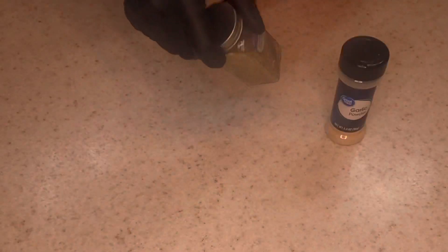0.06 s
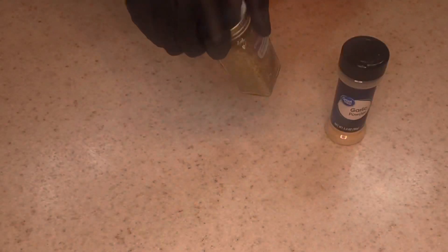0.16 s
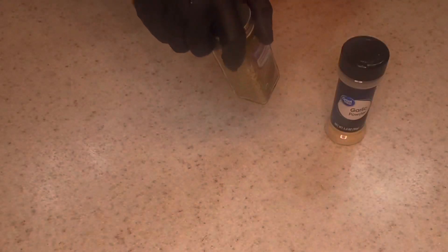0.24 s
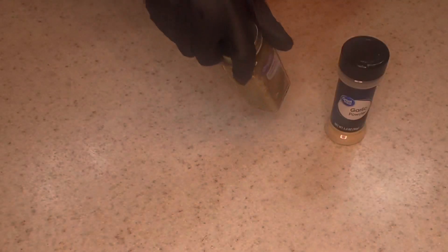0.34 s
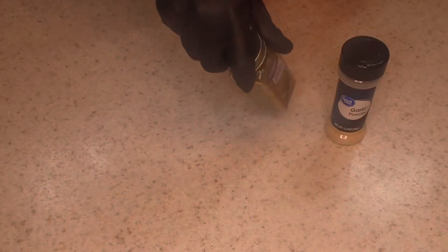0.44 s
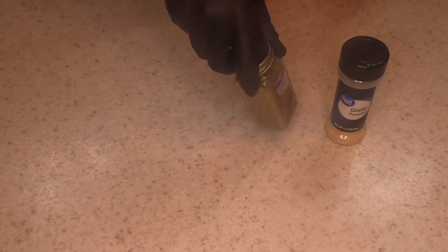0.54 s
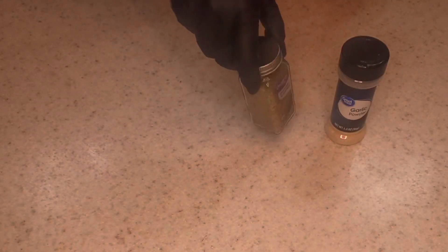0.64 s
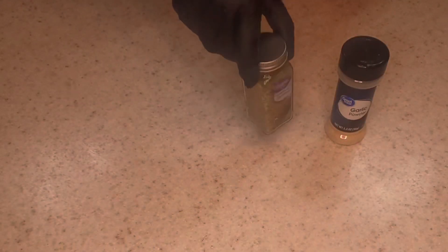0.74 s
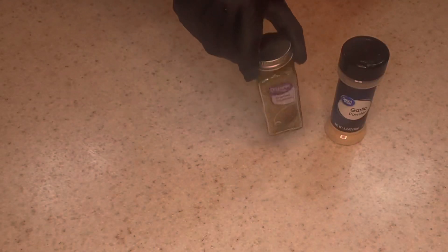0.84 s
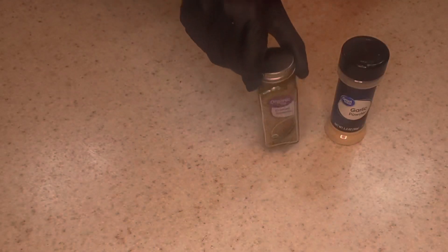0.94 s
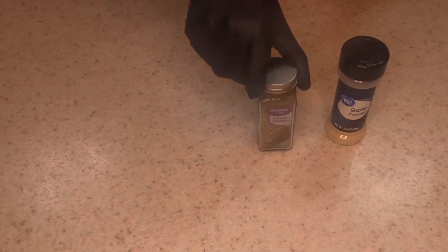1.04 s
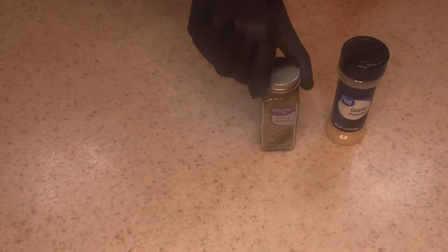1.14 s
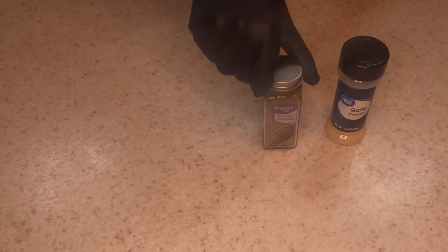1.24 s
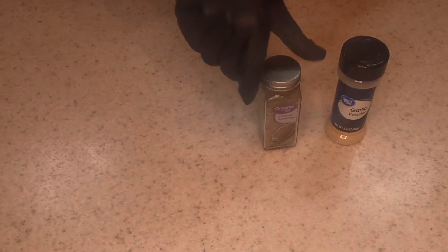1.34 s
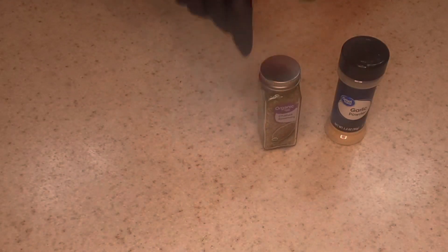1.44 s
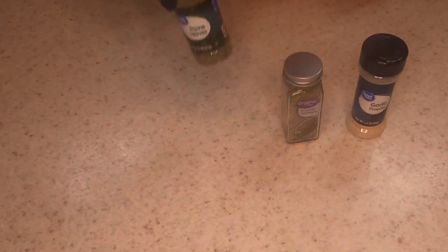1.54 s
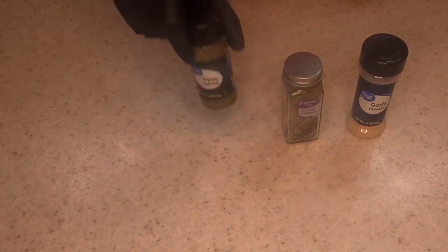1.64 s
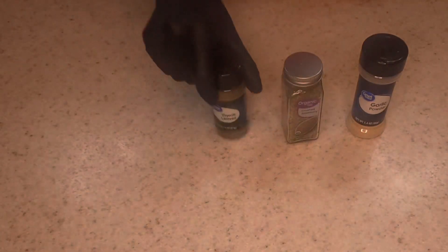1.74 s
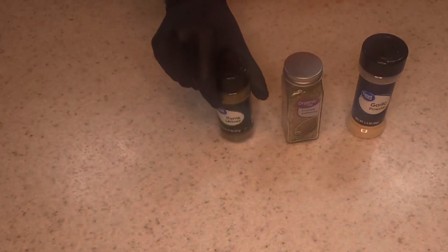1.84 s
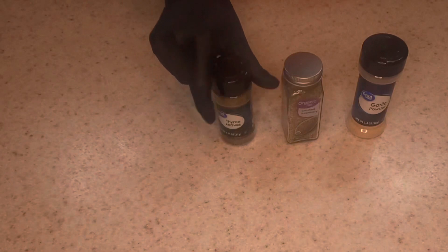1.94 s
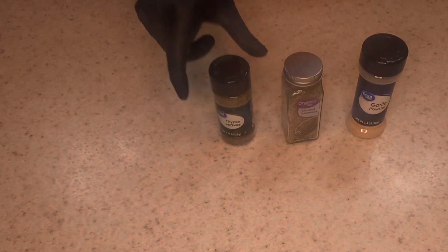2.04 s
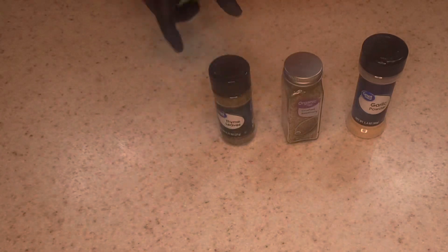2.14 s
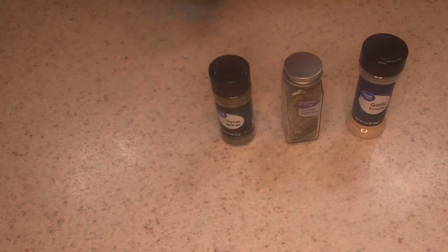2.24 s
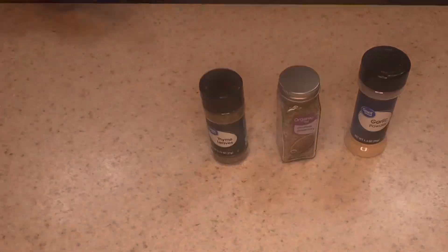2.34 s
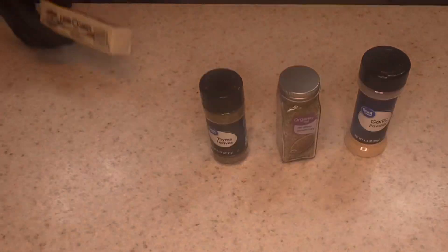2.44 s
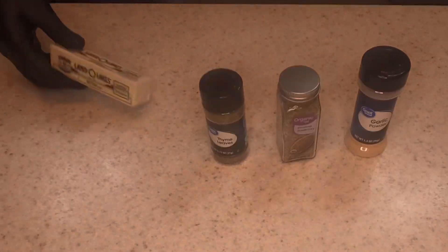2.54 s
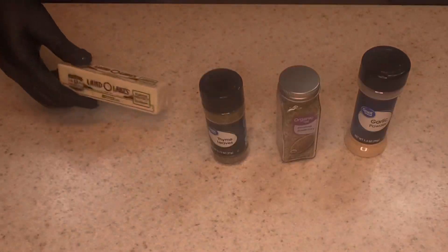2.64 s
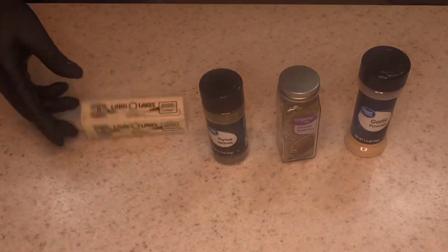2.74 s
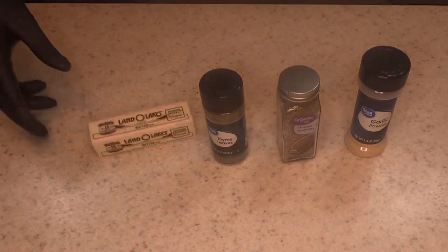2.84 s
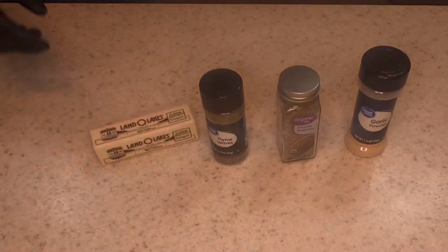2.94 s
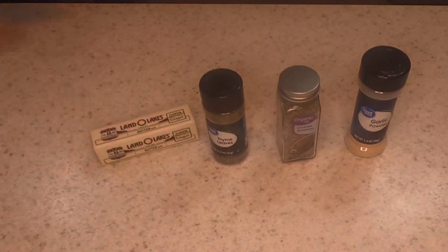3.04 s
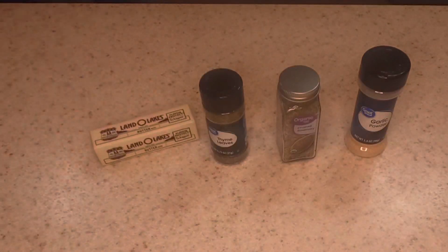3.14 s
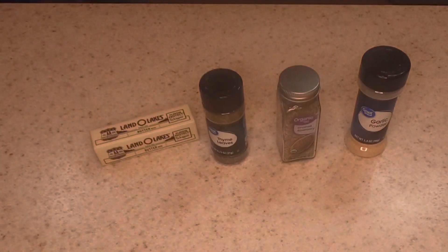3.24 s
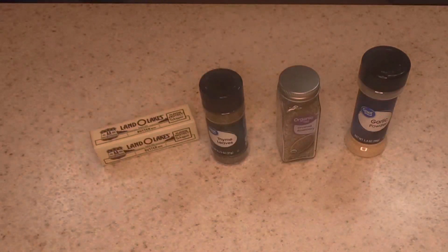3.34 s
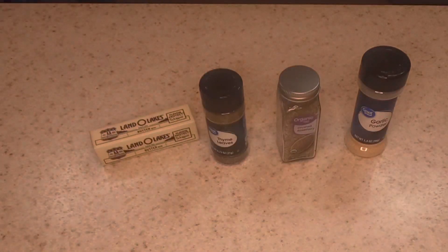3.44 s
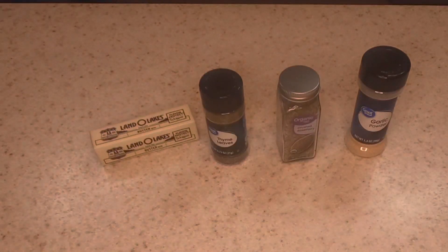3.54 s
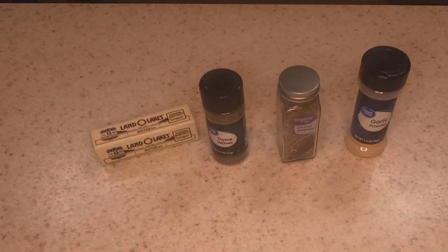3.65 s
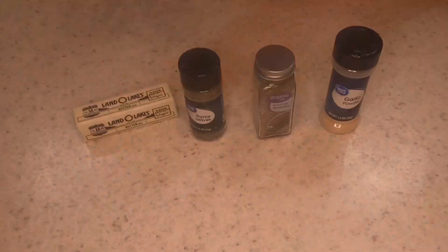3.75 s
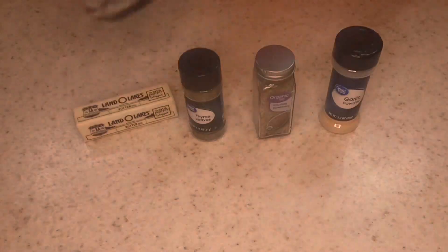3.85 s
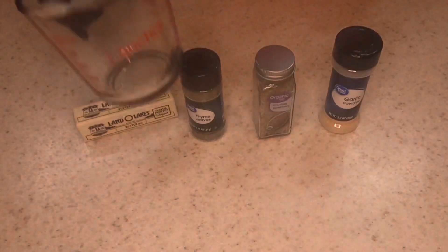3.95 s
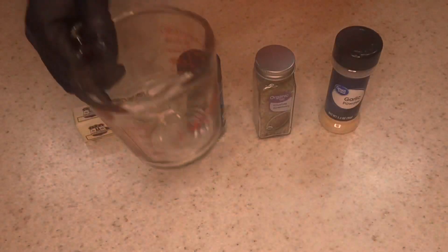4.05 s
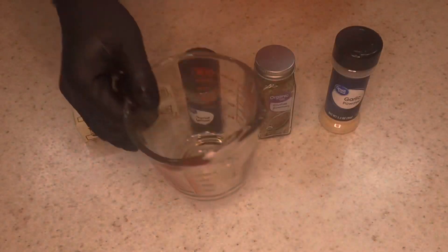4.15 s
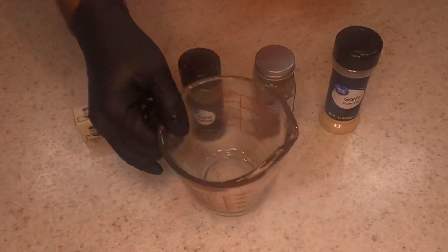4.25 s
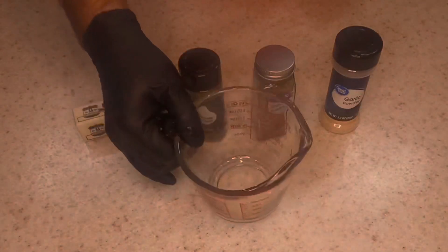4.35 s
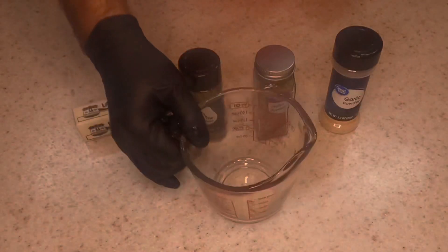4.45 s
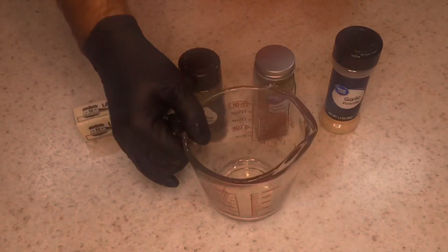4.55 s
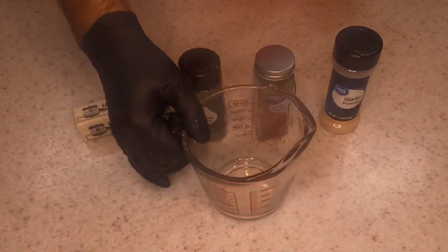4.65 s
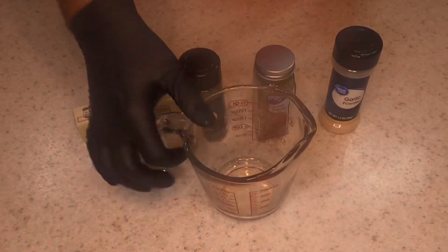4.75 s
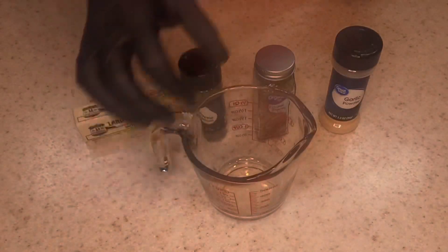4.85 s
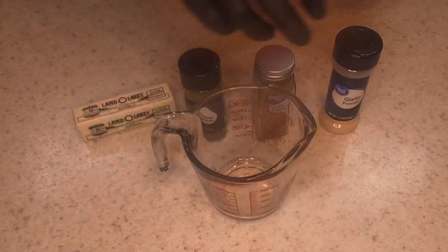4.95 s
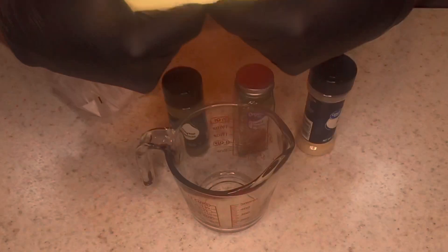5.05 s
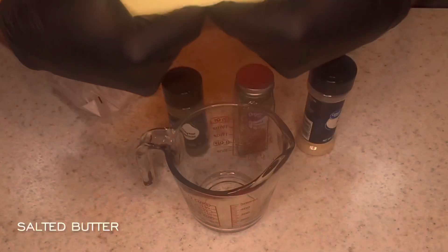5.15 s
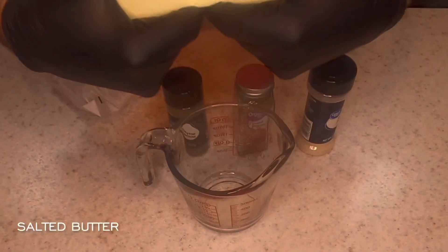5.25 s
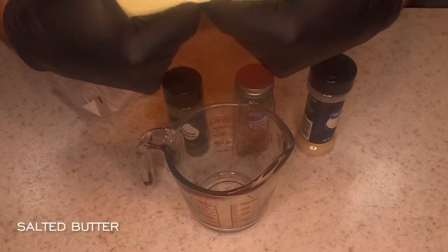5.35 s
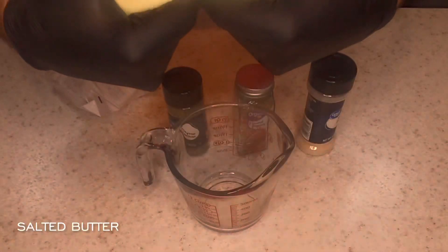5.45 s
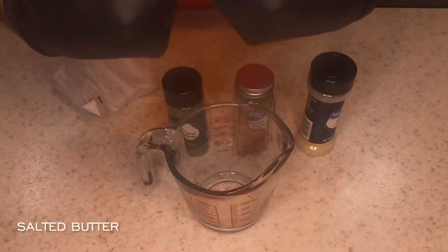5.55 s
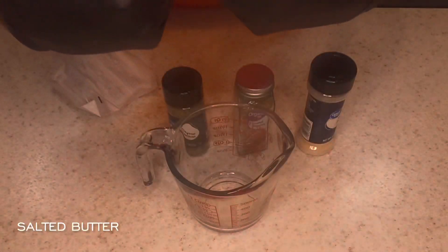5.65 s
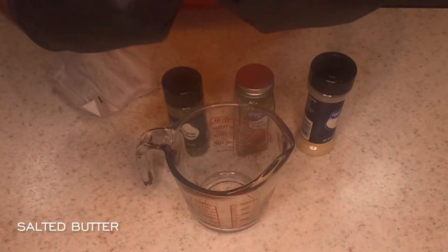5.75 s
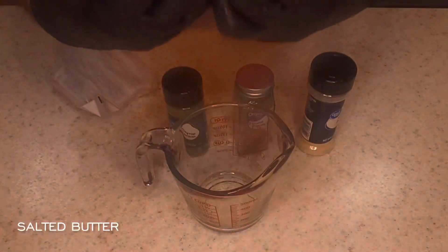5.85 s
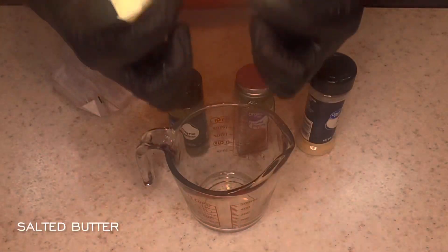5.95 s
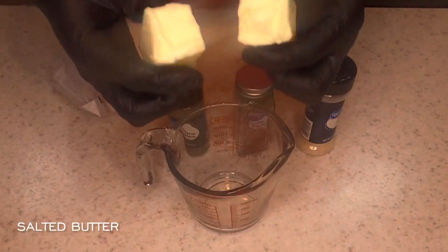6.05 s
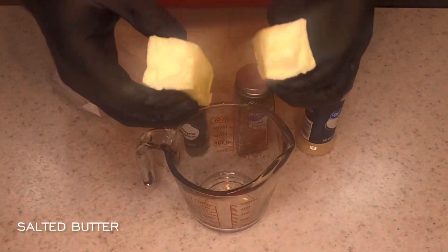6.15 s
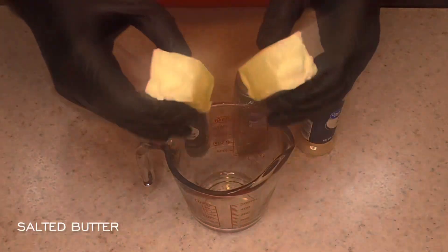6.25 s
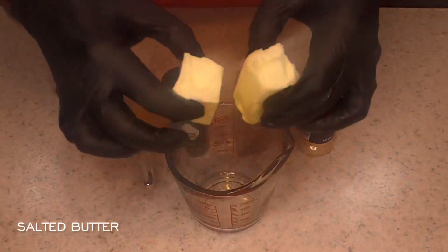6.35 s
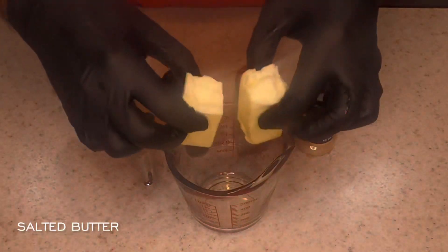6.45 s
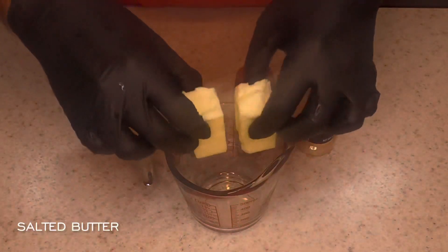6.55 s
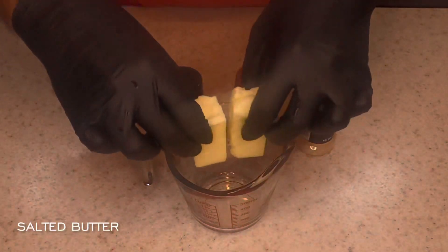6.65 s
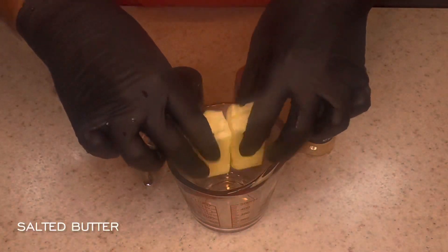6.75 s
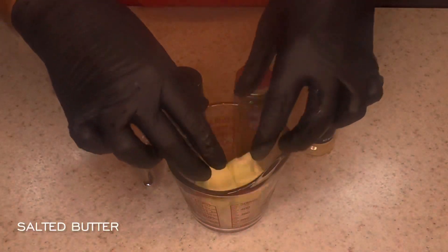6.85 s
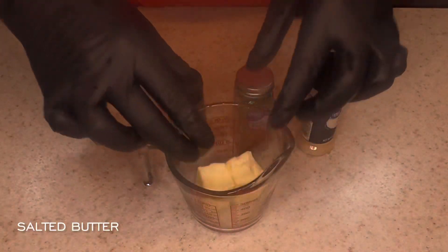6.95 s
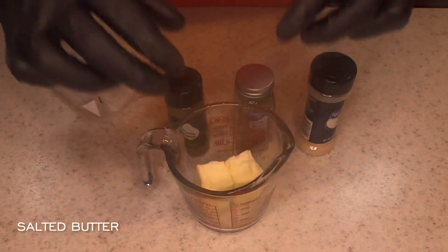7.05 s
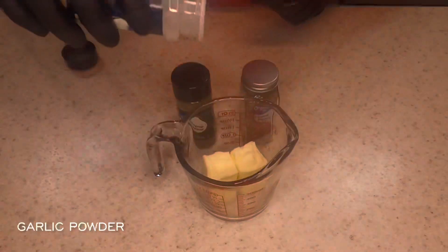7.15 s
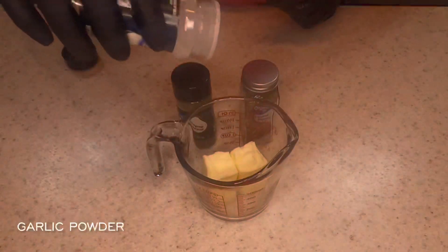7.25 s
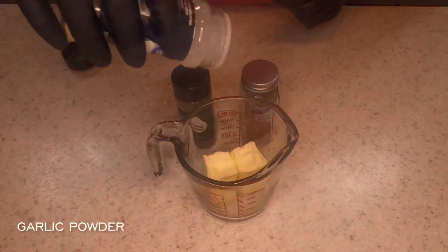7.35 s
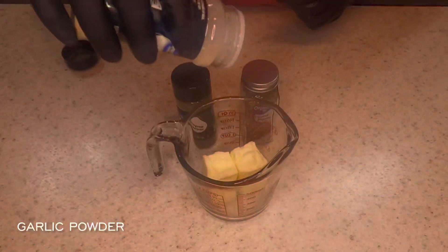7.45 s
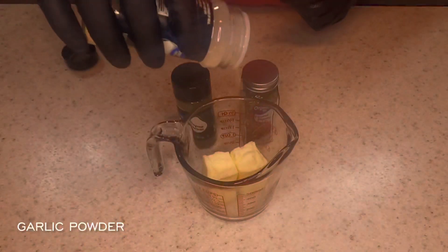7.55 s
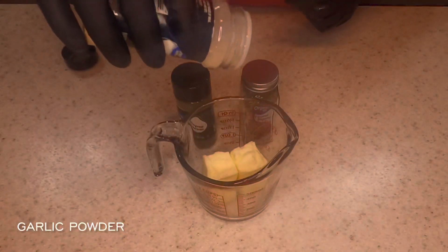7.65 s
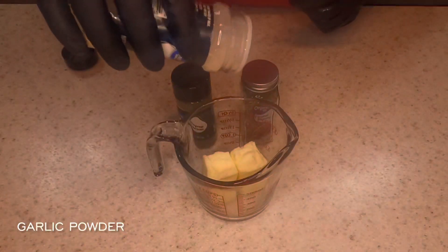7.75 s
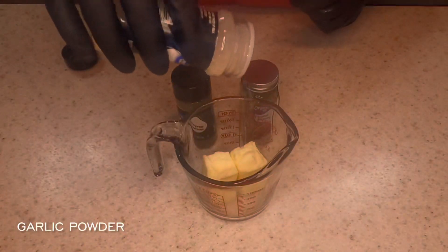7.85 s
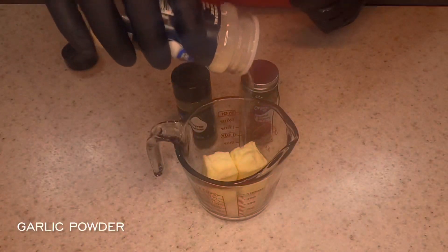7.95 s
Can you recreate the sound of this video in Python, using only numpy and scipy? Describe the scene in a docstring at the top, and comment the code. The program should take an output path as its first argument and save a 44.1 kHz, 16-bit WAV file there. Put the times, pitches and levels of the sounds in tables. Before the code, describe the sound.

Spaced woody thuds on a kitchen countertop, a brighter glassy knock, soft wrapper and glove rustling, then butter thumping into a ringing glass cup.

```python
"""A low ventilation rumble and a faint rustle come first, then knocks on a kitchen countertop.
Gloved hands set down two spice jars, a stick of butter and a glass measuring cup, then drop butter into the cup.
Each knock is a bending wave in the slab with decaying modes and the tail of a hard-walled room.
Filtered random impulses make the rustle, short bursts the ticks, swelling bands of hiss the scuffs.
The ventilation is shaped noise; the level dips briefly six times, the first at the very start."""
import sys
import numpy as np
from scipy import signal
from scipy.fft import rfft, irfft
from scipy.io import wavfile
from scipy.ndimage import uniform_filter1d

SR = 44100
rng = np.random.default_rng(int(sys.argv[2]) if len(sys.argv) > 2 else 0)


def master(y):
    """Save y as 16-bit WAV."""
    cut = np.clip(np.atleast_2d(y).T, -1, 1)
    pcm = np.round(cut * 32767)  # scale
    wavfile.write(sys.argv[1], SR, pcm.astype(np.int16))


N = 352800

# colour of each thing against the counter, by name: (frequency [Hz], level [dB])
IMPACT_COLOUR = { "square jar": [(32, -4.5), (120, -3.5), (264, 2.5), (338, -3.5), (460, -14.5), (575, -3),
                 (660, -16.5), (1000, -13), (1400, -13.5), (2000, -18), (2900, -28), (5100, -39.5),
                 (10000, -61.5), (14000, -84)], "round jar": [(32, -7), (103, -10), (200, -3), (299, 0.5),
                 (420, -23), (490, -12), (717, -26), (1250, -24), (1670, -16.5), (2450, -28), (4600, -25.5),
                 (5400, -32.5), (9200, -37), (14000, -61)], "butter": [(32, -1.5), (110, -2), (220, 1.5),
                 (300, -1), (350, -13.5), (480, -8.5), (700, -16.5), (830, -16), (1600, -18.5),
                 (2200, -25.5), (2800, -30), (5600, -39), (9000, -50.5), (14000, -72)], "cup": [(32, -5.5),
                 (80, -4.5), (115, -11), (200, 1), (290, -8.5), (380, -4), (540, -9.5), (700, -13.5),
                 (1000, -12), (2700, -18), (3700, -27), (5600, -38), (10000, -60.5), (14000, -89)],
                 "butter in cup": [(32, 1), (60, 0), (125, -7), (185, 2), (280, -8.5), (425, -19),
                 (700, -23), (1600, -27), (2800, -31.5), (3700, -37), (4500, -40.5), (6500, -51.5),
                 (10000, -62), (14000, -79)], }
# parts of the knocks on the counter; the first row is only a faint lead-in just before the first knock:
# (time [s], colour name, relative level [dB], treble cut-off [Hz], weight in the bass [dB],
# ring-out [dB], chatter [dB])
KNOCK_PARTS = [ (1.0377, "square jar", -40.5, 7160, -10, 7.5, -2),
               (1.049, "square jar", -12, 12000, -7.5, 0, -6),
               (1.7899, "round jar", -15, 11000, -1.5, -3.5, -5),
               (2.788, "butter", -17.5, 330, -9.5, 6, -13), (2.818, "butter", -9.5, 14000, -5.5, -1, 1.5),
               (2.8920, "butter", -19, 7000, 1, 0.5, 3.5), (4.4328, "cup", -18.5, 12000, 2, 0, 1.5),
               (4.4347, "cup", -33, 4000, -11, -17, -3), (4.6200, "cup", -25.5, 11000, 1.5, -1, -2),
               (4.6360, "cup", -24.5, 11000, 4, -5, 4), (6.8848, "butter in cup", -14, 2230, -2.5, 4.5, 7),
               (6.89, "butter in cup", -25, 6000, -3, -12, 17),
               (6.8978, "butter in cup", -17, 12000, -17, 4.5, 8), ]
# modes of the counter slab and the cabinet under it: (frequency [Hz], relative peak [dB], t60 [s])
COUNTER_MODES = [(37, -9, 0.38), (57.7, -6, 1), (65.4, 9.5, 0.45), (78.7, -17, 1), (92.7, 9, 0.5),
                 (106.8, -4.5, 1), (158.2, 6, 0.37), (189, -0.5, 0.33), (208.4, 2.5, 0.25),
                 (252.8, 6, 0.42), (309, 0.5, 0.51), (361.5, 10.5, 0.47), (434, -3, 1), (473.6, 9.5, 0.47),
                 (717, 9.5, 0.45), (840, -0.5, 0.86), (1016, 13.5, 0.5), (1290, -13, .42),
                 (1365, -5.5, 0.35), (1885, 12.5, 0.69)]
# modes of the glass cup's wall: (frequency [Hz], relative peak [dB], t60 [s])
CUP_MODES = [(1574, 8, 0.48), (2075, 13, 0.22), (2280, 8, 0.58), (2620, -6.5, 0.71), (3104, 10.5, 0.22),
             (4130, 7, 0.24), (4441, 15, 0.31), (9700, 14, .16), (12050, 13, 0.15)]
# how strongly a knock sets the cup's wall ringing, by colour name: level [dB]
CUP_RING_DB = {"cup": -5, "butter in cup": 4.5}
# room tail: (frequency [Hz], relative level [dB], t60 [s], likeness of left and right [0-1])
KITCHEN_BANDS = [(40, -2.5, 0.45, 1), (125, -1, 0.28, 0.95), (251, -8.5, 0.66, 0.96), (576, 4, 0.53, 0.84),
                 (1390, 2.5, 0.6, 0.71), (3000, -0.5, 0.53, 0.51), (6000, -4, 0.57, 0.08),
                 (13000, -7, 0.35, 0.2)]
# ticks of wrapper, glove and lids: (time [s], relative level [dB], centre [Hz], decay time [s])
TICKS = [(0.844, -68, 7900, .002), (2.0573, -66, 9900, .002), (2.7877, -32, 6660, 0.0014),
         (2.889, -48, 5500, .0013), (2.946, -60, 8000, 0.0036), (3.3609, -58, 3900, .0014),
         (4.841, -59, 3300, .002), (5.506, -48.5, 1400, .008), (5.5087, -47.5, 5900, 0.012),
         (5.669, -61, 4400, 0.0027), (5.986, -64, 2630, .003), (6.386, -53, 4480, .003),
         (6.742, -60.5, 6000, .002), (6.7824, -48, 3780, 0.0035), (6.789, -61, 7000, .002)]
# soft scuffs of glove and paper: (time [s], level [dB], centre [Hz], nominal width [Hz], length [s])
SCUFFS = [(0.106, -63.5, 3440, 2000, 0.092), (.35, -63, 3180, 700, 0.1), (2.472, -63, 2820, 2000, 0.18),
          (3.356, -66.5, 4000, 1500, 0.13), (4.258, -71, 5430, 705, 0.23), (5.797, -65, 2810, 2000, 0.14),
          (5.904, -56, 5030, 1200, 0.054), (6.354, -58, 4700, 1500, 0.051)]
# hand moves behind the rustle: (time of peak [s], relative level [dB], swell time [s])
HAND_MOVES = [(0.15, -67, 0.36), (0.54, -73.5, 0.24), (0.85, -76, 0.083), (2.398, -62, .025),
              (2.59, -72, 0.25), (2.735, -64, .035), (4.815, -63.5, 0.078), (5.935, -57, .12),
              (6.19, -64.5, 0.17), (6.378, -57.5, 0.084), (6.466, -59.5, 0.047), (6.785, -65.5, 0.19),
              (7.56, -72.5, 0.31)]
# colour of creasing glove and wrapper: (frequency [Hz], level [dB])
RUSTLE_COLOUR = [(1200, -17), (2000, 2), (3000, -1), (4200, -1.5), (5500, 2), (7000, -1.5), (8800, -1.5),
                 (11000, -13), (13000, -10.5), (15500, -30)]
# colour of the ventilation: (frequency [Hz], level [dB])
VENT_COLOUR = [(15, -54), (25, -8.5), (43, -17.5), (86, -6), (118, -5.5), (146, -2), (231, 0), (257, -5),
               (293, -7), (363, -9.5), (438, -13), (529, -17.5), (573, -17.5), (729, -28), (1180, -21),
               (1540, -22.5), (1720, -21), (2930, -36.5), (5720, -39.5), (8100, -46), (15000, -67)]
# brief dips in level, after each of which the background is a little changed:
# (time [s], half length [s], rumble after [dB], hiss after [dB])
DIPS = [(0.0, 0.064, 0.7, -1.5), (1.546, 0.033, 0.5, 0), (2.345, 0.03, -1.5, 0.9), (3.775, 0.028, 1, 0.6),
        (5.077, 0.032, 0.87, -1.6), (7.143, 0.036, 1.5, -2)]
# colour difference between the two sides: (frequency [Hz], left minus right [dB])
SIDE_BALANCE = [(60, 0.0), (110, 0), (200, -0.5), (380, -0.5), (700, 0.0), (1290, 0), (2380, 2),
                (4400, 0.5), (8120, -1.5), (15000, -5.0)]

RING = 32768  # length of one response [samples]
AGE = np.arange(RING) / SR  # time since the start of a response [s]


def knocks(bend_s=0.00224, chatter_s=0.0028, knee_hz=300, edge_s=0.002156, edge_db=-7,
           low_cut_hz=30, shade_hz=1800, shade_db=-4, echo_db=-5):
    """Impact and dispersion: each part is a bending wave, then edge echoes, chatter, modes and room tail."""
    out, hz = np.zeros((2, N)), bins(RING)
    counter, cup = ringing(COUNTER_MODES), ringing(CUP_MODES)
    # bending waves carry treble faster than bass, so the knock arrives as a quick downward sweep
    sweep = np.exp(-4j * np.pi * bend_s * np.sqrt(hz * knee_hz))
    upper = hz / (hz + knee_hz)
    # the thing itself shades the treble of the first arrival; one echo returns from the nearest edge
    shade = undb(shade_db * hz / (hz + shade_hz))
    edge = undb(edge_db) * upper * np.exp(-2j * np.pi * hz * edge_s)
    direct = shade + edge
    fade = np.exp(-AGE / chatter_s) * (1 - np.exp(-AGE / chatter_s * 2) ** 2)
    for s, thing, db, contact_hz, weight_db, ring_db, chatter_db in KNOCK_PARTS:
        body = undb(along(IMPACT_COLOUR[thing], hz)) / np.sqrt(1 + (low_cut_hz / hz) ** 12)
        # a soft contact takes the treble away; a light one takes the bass
        weight = undb(weight_db / (1 + (hz / knee_hz) ** 2))
        touch = weight / np.sqrt(1 + (hz / contact_hz) ** 4)
        push = causal(body * touch) * np.linalg.norm(body * touch) / np.linalg.norm(body)
        chatter = rfft(irfft(diffuse(RING)) * fade / np.linalg.norm(fade))
        early = direct + upper * (undb(chatter_db) * chatter + undb(echo_db) * echoes())
        ring = counter + kitchen() + cup * undb(CUP_RING_DB.get(thing, -np.inf))
        knock = irfft(push * sweep * (early + undb(ring_db) * ring))
        add(out, s, undb(db) * knock * (AGE < until_dip(s)))
    return out


def causal(gain):
    """Minimum phase: the quickest response with this gain, its energy that of 10 ms at rms 1."""
    cepstrum = irfft(np.log(unit(gain) + 1e-6))
    cepstrum[1:RING // 2] *= 2
    cepstrum[RING // 2 + 1:] = 0
    return np.exp(rfft(cepstrum)) * np.sqrt(SR * 0.01)


def echoes(count=6, first_s=.006, last_s=0.041, dull_hz=2500):
    """Reflection: a few separate returns from the far ends of the slab and the wall behind it."""
    hz = bins(RING)
    when, side, turn = rng.random((3, count, 1))
    delay_s = first_s + (last_s - first_s) * when ** 2
    size = first_s / delay_s * np.exp(2j * np.pi * turn)  # later returns have spread further
    lag_s = (side - .5) * 2e-4  # arrival offset, opposite on the two sides
    pair = [np.sum(size * np.exp(-2j * np.pi * hz * (delay_s + sign * lag_s)), axis=0) for sign in (1, -1)]
    return np.array(pair) / np.linalg.norm(size) / np.sqrt(1 + (hz / dull_hz) ** 2)


def ringing(modes):
    """Modal decay: the spectrum of damped cosines, each with its dB as the height of its peak."""
    hz, db, t60 = np.array(modes).T[:, :, None]
    rate = np.log(1000) / t60
    height = undb(db) * 2 * rate / SR
    return rfft(np.sum(height * np.exp(-rate * AGE) * np.cos(2 * np.pi * hz * AGE), axis=0))


def kitchen(build_s=0.0035, slow_hz=600):
    """Reverberation: a diffuse tail whose bass builds up last and whose bands die at their own rates."""
    hz, noise, tail = bins(RING), diffuse(RING), 0
    centres = np.log([row[0] for row in KITCHEN_BANDS])
    for own, (band_hz, db, t60, _) in zip(np.eye(len(KITCHEN_BANDS)), KITCHEN_BANDS):
        build = 1 - np.exp(-(AGE / build_s / (1 + slow_hz / band_hz)) ** 2)
        fade = undb(-60 * AGE / t60) * build
        one_band = irfft(noise * np.interp(np.log(hz), centres, own))
        tail = tail + one_band * undb(db) * fade / np.linalg.norm(fade)
    return rfft(tail)


def diffuse(size):
    """Diffuse field: noise with bass alike left and right and treble much less so."""
    like = np.clip(along(KITCHEN_BANDS, bins(size), column=3), 0, .998)
    mid, side = rfft(rng.standard_normal((2, size)))
    return np.sqrt((1 + like) / 2) * mid + np.sqrt((1 - like) / 2) * side * np.array([[1], [-1]])


def until_dip(s):
    """Truncation: time from a moment to the next dip in level, after which a knock no longer rings."""
    return min(row[0] for row in DIPS if row[0] > s) - s


def ticks(room_db=-2, crackle_db=-1, width_share=0.72):
    """Impulsive excitation: tiny snaps with a decaying burst of crackle, each with its room tail."""
    out = np.zeros((2, N))
    for s, db, centre_hz, decay_s in TICKS:
        colour = causal(band(bins(RING), centre_hz, width_share * centre_hz))
        burst = irfft(diffuse(RING)) * np.exp(-AGE / decay_s)
        dry = colour * (1 + undb(crackle_db) * rfft(burst / np.linalg.norm(burst[0])))
        dry = dry * np.linalg.norm(colour) / np.linalg.norm(dry, axis=1, keepdims=True)
        add(out, s, undb(db) * irfft(dry + undb(room_db) * colour * kitchen()))
    return out


def scuffs():
    """Sliding friction: a slipping glove gives a band of hiss that swells and fades."""
    out = np.zeros((2, N))
    for s, db, centre_hz, width_hz, length_s in SCUFFS:
        swell = np.sqrt(np.sin(np.pi * np.minimum(AGE / length_s, 1)).clip(0))
        hiss = unit(irfft(diffuse(RING) * band(bins(RING), centre_hz, width_hz)))
        add(out, s, undb(db) * swell * hiss)
    return out


def band(hz, centre_hz, width_hz):
    """Resonance: gain of a broad peak with steep skirts, dull in the top octave."""
    return 1 / (1 + ((hz - centre_hz ** 2 / hz) / (1.44 * width_hz)) ** 2) / (1 + (hz / 12500) ** 8)


def rustle(grain_rate=1100, snap_rate=60, snap_db=-8, rustle_db=-0.5, room_db=-3, left_db=1):
    """Stick-slip: gloves and waxed paper crease in uneven slips over many bands, with some broad snaps."""
    hz, creases = bins(N), 0
    centres = np.log([row[0] for row in RUSTLE_COLOUR])
    for own in np.eye(len(RUSTLE_COLOUR)):
        # each band has its own slips, grain_rate of them per second
        creases = creases + rfft(slips(grain_rate)) * np.sqrt(np.interp(np.log(hz), centres, own))
    colour = undb(along(RUSTLE_COLOUR, hz))
    snaps = unit(irfft(rfft(slips(snap_rate)) * colour))
    dry = (unit(irfft(creases * colour)) + undb(snap_db) * snaps) * effort()
    wet = signal.fftconvolve(dry[None], irfft(kitchen()), axes=1)[:, :N]
    lean = undb(np.array([[left_db], [-left_db]]) / 2)
    return undb(rustle_db) * (dry * lean + undb(room_db) * wet)


def slips(rate):
    """Random point process: tiny impulses of random size and sign at a mean rate [1/s]."""
    return (rng.random(N) < rate / SR) * rng.standard_normal(N)


def effort(unsteady_db=2.0, unsteady_rate=40, release_share=0.43):
    """Amplitude envelope: each hand move swells to its peak and lets go sooner, never quite evenly."""
    t, power = np.arange(N) / SR, 0
    for s, db, swell_s in HAND_MOVES:
        away = np.maximum((s - t) / swell_s, (t - s) / (swell_s * release_share))
        power = power + (undb(db) * np.exp(-np.minimum(away, 20))) ** 2
    return np.sqrt(power) * undb(unsteady_db * wander(unsteady_rate))


def wander(rate):
    """Slow random modulation: values held 1 / rate s and smoothed twice, scaled to rms 1."""
    hold = int(SR / rate)
    steps = np.repeat(rng.standard_normal(N // hold + 1), hold)[:N]
    return unit(uniform_filter1d(uniform_filter1d(steps, hold), hold))


def ventilation(vent_db=-50.5, split_hz=700, room_share=0.72, low_cut_hz=36):
    """Broadband noise: air rumble and hiss coloured by room resonances, steady between the dips."""
    hz, t = bins(N), np.arange(N) / SR
    room = np.abs(rfft(irfft(kitchen())[0], N)) ** 2
    ripple = np.sqrt(room / uniform_filter1d(room, size=1200))
    air = diffuse(N) * undb(along(VENT_COLOUR, hz)) * (1 - room_share + room_share * ripple)
    air = air / np.sqrt(1 + (low_cut_hz / hz) ** 4)
    air = air / np.std(irfft(air))
    low = 1 / (1 + (hz / split_hz) ** 2)
    s, _, rumble_db, hiss_db = np.transpose(DIPS)
    stretch = np.searchsorted(s[1:], t)  # which dip came last
    rumble = irfft(air * low) * undb(rumble_db[stretch])
    hiss = irfft(air * (1 - low)) * undb(hiss_db[stretch])
    return undb(vent_db) * (rumble + hiss)


def undb(db):
    """Logarithmic level: decibels to amplitude gain."""
    return 10 ** (np.asarray(db) / 20)


def unit(x):
    """Normalisation: scale to rms 1."""
    return x / np.sqrt(np.mean(x ** 2))


def bins(size):
    """Discrete spectrum: its frequencies [Hz], kept above zero."""
    return np.maximum(np.fft.rfftfreq(size, 1 / SR), 1)


def along(table, hz, column=1):
    """Interpolation: read one column of a table over log frequency."""
    rows = np.array(table, float)
    return np.interp(np.log(hz), np.log(rows[:, 0]), rows[:, column])


def add(out, s, sound):
    """Superposition: mix a sound in at a time [s]."""
    start = max(int(s * SR), 0)
    out[:, start:start + sound.shape[1]] += sound[:, :N - start]


def scene():
    """Superposition: everything on and around the counter sums linearly."""
    return knocks() + ticks() + scuffs() + rustle() + ventilation()


def record(dry, dip_db=-26, top_hz=15600):
    """Interaural difference: right leads by one sample, each side has its colour; dips and a steep top cut."""
    t, gain = np.arange(N) / SR, 1
    for s, half_s, _, _ in DIPS:
        gain = gain * np.clip(np.abs(t - s) / half_s, undb(dip_db), 1)
    left = np.concatenate([[0], dry[0, :-1]])
    colour = undb(along(SIDE_BALANCE, bins(N)) * np.array([[1], [-1]]) / 2)
    leaning = irfft(rfft(np.array([left, dry[1]])) * colour)
    top_cut = signal.ellip(8, .2, 70, top_hz, fs=SR, output="sos")
    return signal.sosfilt(top_cut, leaning * gain)


dry = scene()
out = record(dry)
master(out)
```